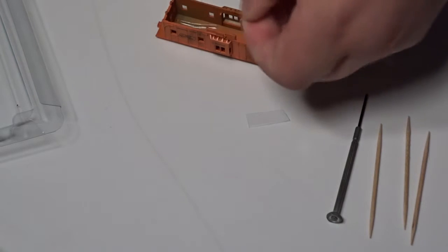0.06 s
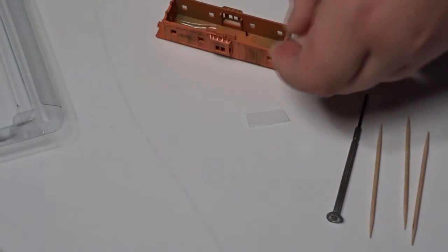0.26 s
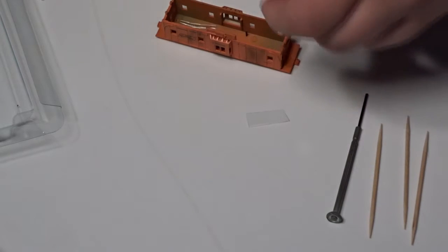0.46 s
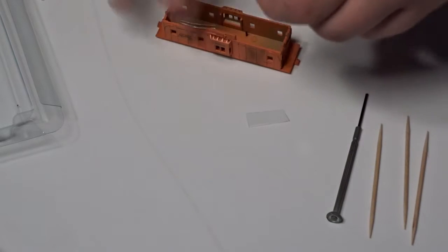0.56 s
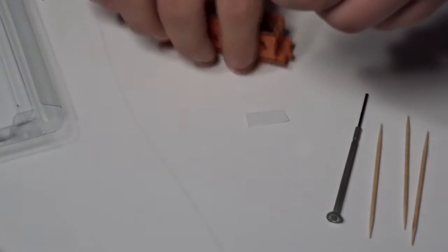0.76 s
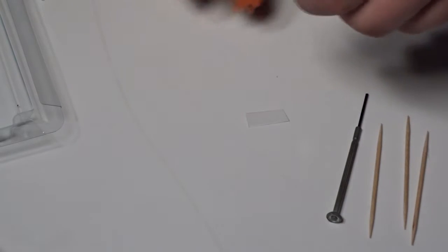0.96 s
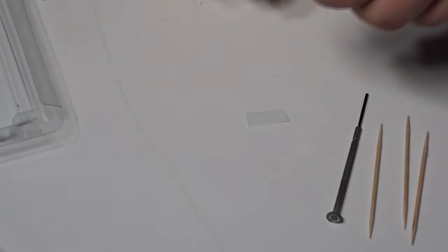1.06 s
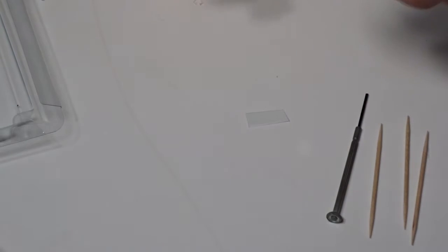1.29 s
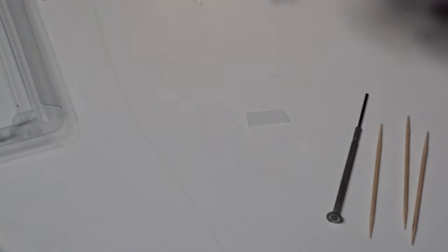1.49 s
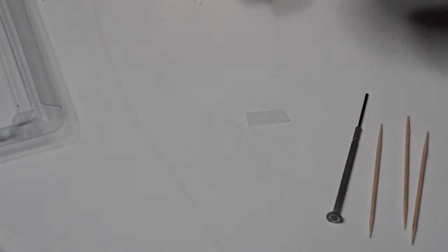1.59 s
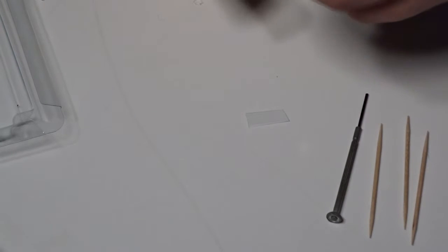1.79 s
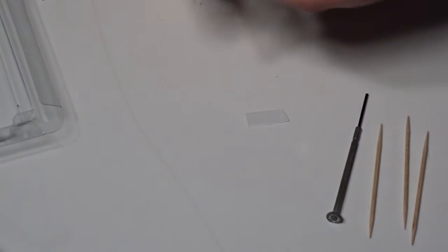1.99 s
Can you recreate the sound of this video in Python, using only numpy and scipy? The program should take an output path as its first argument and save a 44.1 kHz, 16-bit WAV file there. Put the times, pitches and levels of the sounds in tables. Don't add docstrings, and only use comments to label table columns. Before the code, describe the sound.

A small hollow plastic piece knocks and chatters on a table, drags in two short gritty strokes with thin plastic ticks, then faint skin and sleeve rubbing; close microphone in a small quiet room.

```python
import sys
import numpy as np
from scipy import signal
from scipy.fft import rfft, irfft, next_fast_len
from scipy.io import wavfile
from scipy.ndimage import map_coordinates

SR = 44100
rng = np.random.default_rng(int(sys.argv[2]) if len(sys.argv) > 2 else 0)


def put_to_file(sound):
    columns = np.atleast_2d(sound).T
    safe = np.clip(columns, -1, 1)
    whole_steps = np.round(safe * 32767)
    wavfile.write(sys.argv[1], SR, whole_steps.astype(np.int16))


def convert_level_to_amplitude(level_db):
    exponent = np.asarray(level_db, float) / 20
    return 10 ** exponent


N = 90404


def unit(x):
    return x / np.sqrt(np.mean(x ** 2) + 1e-20)


def along(points, hz):
    f, v = np.transpose(points)
    return np.interp(np.log(hz + 1), np.log(f + 1), v)


def level(rows):
    s, db = np.transpose(rows)
    t = np.arange(N) / SR
    outside = np.clip(np.maximum(s[0] - t, t - s[-1]), 0, 1)
    return convert_level_to_amplitude(np.interp(t, s, db) - 4000 * outside)


def wobble(rate):
    knots = rng.standard_normal(int(N * rate / SR) + 4)
    return map_coordinates(knots, [np.arange(N) * rate / SR])


def filtered(x, response):
    size = x.shape[-1]
    m = next_fast_len(size + min(size, SR // 4))
    return irfft(rfft(x, m) * response(np.fft.rfftfreq(m, 1 / SR)), m)[..., :size]


def above(hz, edge_hz):
    u = 1j * hz / edge_hz
    return (u * u / (1 + 1.187 * u + u * u)) ** 2


def body(peaks):
    return lambda f: sum(convert_level_to_amplitude(db) * 1j * f * w / (c * c - f * f + 1j * f * w) for c, w, db in peaks)


# frequency in Hz, likeness [0 to 1].
ALIKE = [(60, 1), (200, 0.27), (600, 0.46), (2000, 0.23), (5500, 0.84), (10000, 0.86), (14500, 0.88)]


def pair(colour, alike=ALIKE, size=N):
    turn = lambda hz: np.arccos(np.clip(along(alike, hz), -1, 1)) / 2
    spread = lambda hz: colour(hz) * [np.cos(turn(hz)), np.sin(turn(hz))]
    mid, side = filtered(rng.standard_normal((2, size)), spread)
    return unit(np.array([mid + side, mid - side]))


def slips(depth_db):
    slips_per_s = 5100
    hit = rng.random(N) < slips_per_s / SR
    impulses = hit * rng.standard_normal(N) * convert_level_to_amplitude(depth_db * wobble(220))
    return unit(impulses + 0.17 * rng.standard_normal(N))


def click(colour, modes, low_hz, tilt_db=0):
    crack_s, spike_db = 0.01, 8
    between_db, scatter_db = -8, 1.5
    t = np.arange(SR // 20) / SR
    x = rng.standard_normal(len(t)) * convert_level_to_amplitude(-60 * t / crack_s)
    x[0] = -convert_level_to_amplitude(spike_db) * 2
    ring = body([(c, w, db + scatter_db * rng.standard_normal()) for c, w, db in modes])

    def response(hz):
        tint = convert_level_to_amplitude(along(colour, hz) + tilt_db * np.log2(0.08 + hz / 3000))
        return tint * above(hz, low_hz) * (convert_level_to_amplitude(between_db) + ring(hz))

    x = filtered(np.pad(x, (64, 0)), response)
    return x / np.abs(x).max()


# frequency in Hz, density in dB per Hz.
AIR = [(22, -36), (40, -1.5), (120, -6.5), (480, -11), (1240, -23), (3000, -26), (5300, -32.5),
       (15600, -24.5)]
# time in seconds, level in dB.
HUM = [(0, -71), (.3, -64), (1.3, -79), (1.501, -78)]
# centre in Hz, width in Hz, level in dB.
HUM_BAND = [(460, 150, 15), (960, 220, 0.5)]


def air():
    drone_level = convert_level_to_amplitude(np.interp(np.arange(N) / SR, *np.transpose(HUM)) + 2.7 * wobble(71))
    drone = drone_level * pair(lambda hz: body(HUM_BAND)(hz) ** 2)
    air_db = -65.5
    return convert_level_to_amplitude(air_db + 0.4 * wobble(7.1)) * pair(lambda hz: convert_level_to_amplitude(along(AIR, hz))) + drone


# time in seconds, level in dB.
RUB = [(0, -68), (.2, -73), (.55, -67), (.72, -69), (.95, -58), (1.04, -71), (1.095, -60), (1.15, -71.5),
       (1.21, -64.5), (1.27, -63.5), (1.36, -62.5), (1.47, -71), (1.62, -81.5), (1.7, -72), (1.85, -76.5),
       (1.93, -69), (2.05, -70)]
# frequency in Hz, density in dB per Hz.
SKIN = [(700, -42), (2000, -8.5), (4000, -3.5), (6000, -3), (8500, -1.5), (11000, -3.5), (15600, -9)]
# time in seconds, level in dB.
ARM = [(.5, -54), (.62, -60.5), (1.0, -58.5), (1.15, -59.5), (1.28, -61.5), (1.33, -67.5)]
# frequency in Hz, density in dB per Hz.
WOOD = [(60, -10.5), (200, -14), (340, -13), (500, -4.5), (800, -16), (1440, -25.5), (2050, -22.5),
        (5200, -39.5)]
# time in seconds, level in dB.
ELBOW = [(1.6, -89.5), (1.69, -69.5), (1.76, -69), (1.85, -82), (2.05, -76.5)]
# centre in Hz, width in Hz, level in dB.
ELBOW_BAND = [(122.3, 43, 6), (222, 104, -9)]


def hands():
    skin = level(RUB) * convert_level_to_amplitude(1.2 * wobble(28.0)) * pair(lambda hz: convert_level_to_amplitude(along(SKIN, hz)))
    elbow = level(ELBOW) * convert_level_to_amplitude(2 * wobble(29.7)) * pair(lambda hz: body(ELBOW_BAND)(hz) ** 2)
    arm = level(ARM) * convert_level_to_amplitude(3.4 * wobble(40)) * pair(lambda hz: convert_level_to_amplitude(along(WOOD, hz)))
    return skin + elbow + arm


TABLE_LOW_HZ = 131
# start in seconds, table thump in dB, plastic crack in dB,
# contact time in ms, crack brightness in dB per octave.
KNOCKS = [(0.2013, -18, -23.5, 0.51, -5), (0.2123, -26, -47, 1.4, -6.5), (0.2162, -33, -47.5, 2.3, -1),
          (0.2227, -41, -42.5, 1.1, -2), (0.233, -31, -56, 3.7, -4.5), (0.283, -16, -17.5, 1.06, -3.5),
          (0.2898, -33, -41.5, 1.36, -2.5), (.2975, -26, -38.5, 0.97, -5.5), (0.309, -30.5, -45.5, 1.2, -4),
          (.3930, -17.5, -27, 0.84, -8), (0.3956, -13, -8, 0.95, 4.5), (0.4048, -13.5, -40.5, 3.23, -0.7),
          (.4060, -29.5, -15.5, 0.8, -2.6), (0.4153, -21, -35, 1.1, -5.5), (0.4193, -23.5, -30, 0.68, -9),
          (0.4266, -14, -19, 1.4, -11), (.4325, -37.5, -32.5, 3.2, -3), (.4414, -38.5, -20, 0.77, -0.5),
          (0.4422, -18, -12.5, 0.88, 2), (0.452, -28, -36.5, 1.7, -1.3), (0.4576, -32.5, -33, 0.96, -8.5),
          (0.4653, -37.5, -44.5, 1.46, -3.5), (0.477, -56, -39, 1.2, -3), (.5600, -43.5, -45, 2.3, -4)]
# centre in Hz, width in Hz, level in dB.
TABLE = [(153, 30, 1), (202, 44, 8), (232.4, 50, 10), (318, 65, 5.5), (419, 130, -3.5), (476, 120, 11),
         (565, 32, -2), (735, 35, -17.5), (860, 70, -5), (960, 120, -7), (1190, 150, -22),
         (1550, 210, -8.5), (2020, 1800, -1)]
# frequency in Hz, density in dB per Hz.
CRACK = [(300, -37.5), (900, 7), (2000, -1.5), (3100, -1), (4200, -5), (6000, -7), (8000, -7.5),
         (15000, -16)]
# centre in Hz, width in Hz, level in dB.
PART = [(1280, 140, -10.5), (2400, 240, -2.5), (3150, 530, 0.9), (4400, 440, -6.5), (5380, 690, -3),
        (7810, 1500, -2), (9330, 600, -3), (13250, 700, -3), (14650, 510, -4)]


def knocks():
    shudder_db, shudder_t60 = -4.5, 0.3
    out, t = np.zeros(N + SR), np.arange(SR // 3) / SR
    top = lambda hz: body(TABLE)(hz) * above(hz, TABLE_LOW_HZ)
    for s, thump_db, crack_db, ms, tilt_db in KNOCKS:
        shudder = rng.standard_normal(len(t)) * convert_level_to_amplitude(-60 * t / shudder_t60) * (1 - np.exp(-t / 0.001))
        push = np.sin(np.pi * np.clip(t * 1000 / ms, 0, 1)) ** 2
        force = np.eye(1, len(t))[0]
        force = force + convert_level_to_amplitude(shudder_db) * shudder / np.linalg.norm(shudder)
        thump = filtered(signal.fftconvolve(force, -push)[:len(t)], top)
        plain_peak = np.abs(filtered(push[:SR // 10], top)).max()
        out[round(s * SR):][:len(t)] += convert_level_to_amplitude(thump_db) * thump / plain_peak
        crack = click(CRACK, PART, 230, tilt_db)
        out[round(s * SR) - 64:][:len(crack)] += convert_level_to_amplitude(crack_db) * crack
    return out[:N]


# time in seconds, level in dB.
RATTLE = [(.204, -44.5), (.278, -66), (.286, -53.5), (.39, -59), (.397, -36), (.445, -39), (.48, -51),
          (.575, -54), (.6, -64)]


def rattle():
    return level(RATTLE) * unit(filtered(slips(depth_db=3), lambda hz: convert_level_to_amplitude(along(CRACK, hz))))


# time in seconds, level in dB.
SLIDE = [(.68, -79), (.8, -66.5), (.93, -70), (1.0, -62), (1.09, -66), (1.13, -76.5), (1.25, -72.5),
         (1.45, -75.5)]
# centre in Hz, width in Hz, level in dB.
SLIDE_BAND = [(1180, 210, 1), (2055, 210, -1), (2500, 580, -1.5), (3100, 350, -8), (3635, 170, -0.1)]


def slide():
    return level(SLIDE) * unit(filtered(slips(depth_db=2.5), lambda hz: body(SLIDE_BAND)(hz) ** 2))


# centre in Hz, width in Hz, level in dB.
SHELL = [(236, 135, 1), (321, 100, 6.5), (560, 190, 3), (975, 147, 4), (1190, 190, -30)]


def shell(hz):
    u = hz / 1070
    return body(SHELL)(hz) * above(hz, TABLE_LOW_HZ) / (1 + 1.2j * u - u ** 2) ** 2


# start in seconds, level in dB,
# contact time in ms.
CATCHES = [(.7355, -46, 1.5), (.7632, -31, 1.3), (.7650, -26, 1.18), (0.7761, -37, .8),
           (0.7823, -36.5, 0.8), (0.7938, -41, 1.1), (0.8108, -31, 0.96), (0.813, -41, 1.2),
           (.824, -36, 1.1), (0.8509, -28.5, 0.89), (0.854, -39.5, 0.88), (0.8631, -33, 1.6),
           (0.8719, -35, 1.8), (.878, -45, 0.36), (0.8929, -31, 1.04), (0.898, -32, 0.42),
           (0.908, -40, 0.42), (0.922, -45.5, 0.41), (1.132, -54, 0.59), (1.163, -54, 1.1),
           (1.228, -56, 1.2), (1.276, -55, 0.58)]


def catches():
    out, t = np.zeros(N + SR), np.arange(SR // 10) / SR
    for s, db, ms in CATCHES:
        bump = filtered(-np.sin(np.pi * np.clip(t * 1000 / ms, 0, 1)) ** 2, shell)
        out[round(s * SR):][:len(t)] += convert_level_to_amplitude(db) * bump / np.abs(bump).max()
    return out[:N]


# time in seconds, level in dB.
DRAG_A = [(.762, -52.5), (.769, -36.5), (.782, -44), (.805, -58.5), (.815, -47.5), (.83, -59.5),
          (.85, -58.5)]
DRAG_B = [(.848, -72), (.853, -48), (.87, -47.5), (.893, -43.5), (.912, -38.5), (.92, -44), (.94, -66),
          (.97, -67.5)]
# centre in Hz, width in Hz, level in dB.
EDGE_A = [(2870, 570, -6), (4510, 280, -9), (5840, 750, 3), (7300, 740, -2.5), (8300, 1200, -3),
          (10120, 1600, 0), (13580, 3000, -4.5)]
EDGE_B = [(994, 130, 1.5), (2500, 880, -8), (4760, 1330, -7), (7000, 1400, -7.5), (8140, 440, -2.5),
          (9340, 520, -6.5), (10800, 350, -8.5), (14300, 2000, -15)]
# time in seconds, level in dB.
WEIGHT = [(.73, -70), (.762, -52.5), (.766, -39.5), (.785, -43.5), (.805, -51), (.814, -45), (.847, -59),
          (.853, -41), (.9, -49.5), (.925, -47.5), (.945, -74), (.97, -60)]


def drags():
    first_edge = lambda hz: body(EDGE_A)(hz) ** 2
    second_edge = lambda hz: body(EDGE_B)(hz) ** 2
    out = 0
    for rows, ring in ((DRAG_A, first_edge), (DRAG_B, second_edge), (WEIGHT, shell)):
        x = slips(depth_db=2.0)
        out = out + filtered(level(rows) * x, ring) / np.std(filtered(x, ring))
    return out


# start in seconds, peak in dB, ring in Hz,
# ring over the click in dB, lowest frequency of the click in Hz.
TICKS = [(0.7966, -29, 11460, -26, 7800), (0.812, -26.5, 10730, -9, 6420), (0.8514, -30, 9100, -1.5, 7000),
         (.8600, -32, 8900, -7, 4550), (0.9084, -35, 8210, 16, 4070), (0.915, -30.5, 8200, -3, 2500),
         (1.1237, -39.5, 9460, -1, 5000), (1.195, -22.5, 7300, -14.5, 694), (1.2053, -39, 7650, -6, 3000),
         (1.2987, -35.5, 8480, -27, 940), (1.8655, -51, 13000, -4, 4130)]
# frequency in Hz, density in dB per Hz.
SNAP = [(900, -7.5), (4000, -7), (8000, -5), (15000, -15)]
# centre in Hz, width in Hz, level in dB.
SHEET = [(1030, 150, -0.5), (2000, 400, -11), (3400, 610, -3), (4300, 350, -9.5), (5590, 330, -4.5),
         (7090, 740, -4), (8730, 260, -4), (10470, 450, 5.3), (12000, 420, 3)]


def ticks():
    ring_t60 = 0.011
    out, t = np.zeros(N + SR), np.arange(SR // 20) / SR
    for s, db, hz, ring_db, low_hz in TICKS:
        snap = click(SNAP, SHEET, low_hz)
        decay = convert_level_to_amplitude(ring_db - 60 * t / ring_t60)
        snap[64:] += decay * np.sin(2 * np.pi * hz * t) * (1 - np.exp(-t / 0.00059))
        out[round(s * SR) - 64:][:len(snap)] += convert_level_to_amplitude(db) * snap
    return out[:N]


# start in seconds, length in seconds, level in dB.
FILM_STROKES = [
    (1.675, 0.025, -73.5),
    (1.739, 0.022, -62.5),
    (1.779, 0.012, -66),
    (1.794, .025, -74.5),
]
# centre in Hz, width in Hz, level in dB.
FILM = [(4800, 360, -1), (5400, 260, 9.5), (7200, 1200, -2.5), (9800, 340, 3), (13000, 3000, -22)]


def film():
    t = np.arange(N) / SR
    shape = 0
    for s, length, db in FILM_STROKES:
        rise = np.clip((t - s) / 0.004, 0, 1)
        fall = np.clip((s + length - t) / 0.018 + 1, 0, 1)
        shape = shape + convert_level_to_amplitude(db) * rise * fall
    return shape * unit(filtered(slips(depth_db=2.5), lambda hz: body(FILM)(hz) * above(hz, 4400)))


# frequency in Hz, t60 in seconds.
ROOM = [(200, 0.24), (600, 0.23), (2000, 0.33), (8000, 0.21), (14000, 0.21)]
# frequency in Hz, likeness [0 to 1].
ROOM_ALIKE = [(250, 1), (600, .93), (2000, .65), (5500, 0.97), (10000, .9), (14500, .8)]


def room(x):
    low_hz, wall_s = 300, 0.0032
    out, step = np.zeros((2, N + 2 * SR)), SR // 9
    for start in range(0, N, step):
        noise = pair(lambda f: np.abs(above(f, low_hz)), ROOM_ALIKE, size=SR // 2)
        hz, t, z = signal.stft(noise, SR, nperseg=256)
        tail = signal.istft(z * convert_level_to_amplitude(-60 * t / along(ROOM, hz)[:, None]), SR, nperseg=256)[1]
        tail = tail * (1 - np.exp(-np.arange(tail.shape[1]) / (wall_s * SR)))
        tail = tail / np.linalg.norm(tail) * np.sqrt(2)
        wet = signal.fftconvolve(x[None, start:start + step], tail, axes=1)
        out[:, start:start + wet.shape[1]] += wet
    return out[:, :N]


def scene():
    near = knocks() + ticks() + drags() + catches() + slide() + film() + rattle()
    left_db, lag_s, room_db = 0.22, 4e-6, -9
    side = np.array([[1], [-1]])
    direct = filtered(near[None], lambda hz: convert_level_to_amplitude(side * left_db) * np.exp(-1j * np.pi * side * hz * lag_s))
    return direct + convert_level_to_amplitude(room_db) * room(near) + hands() + air()


def roll_off(x):
    return signal.sosfilt(signal.butter(12, 16800, fs=SR, output="sos"), x)


def record(dry):
    treble_rise = body([(8340, 2100, -3.5)])
    top_hz = 15850
    x = filtered(dry, lambda hz: (1 + treble_rise(hz)) * (hz < top_hz))
    return roll_off(x)


dry = scene()
out = record(dry)
put_to_file(out)
```